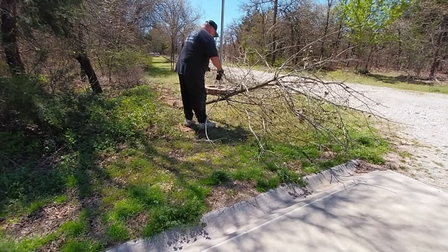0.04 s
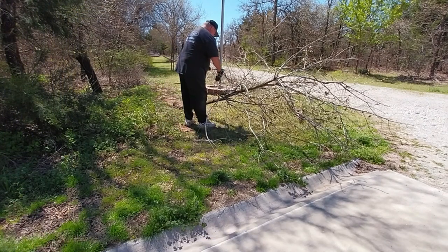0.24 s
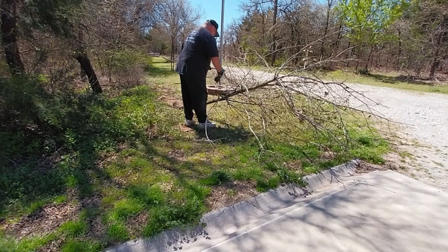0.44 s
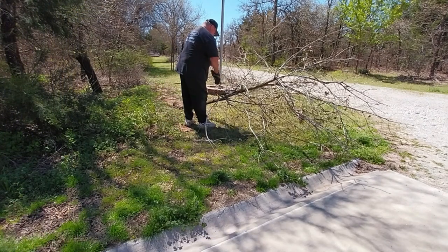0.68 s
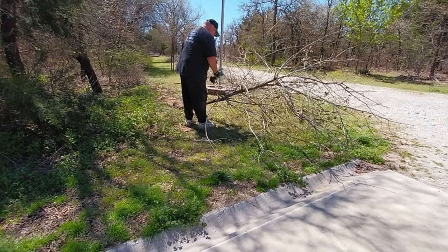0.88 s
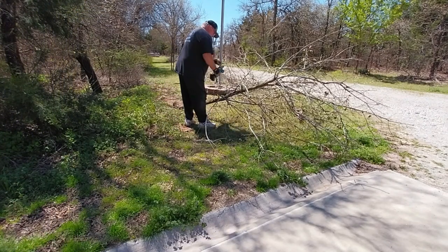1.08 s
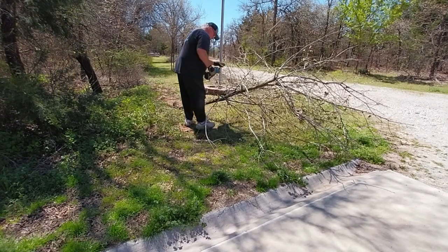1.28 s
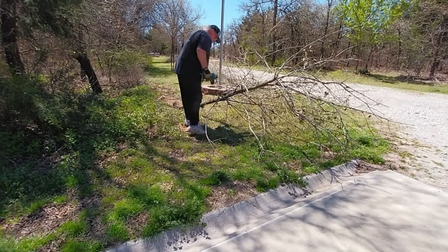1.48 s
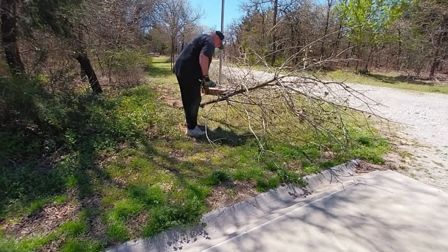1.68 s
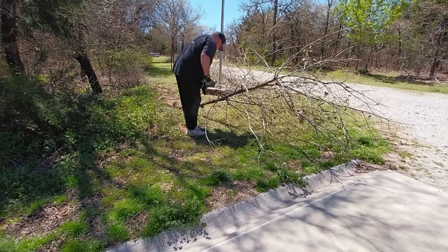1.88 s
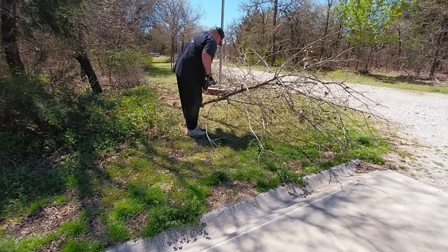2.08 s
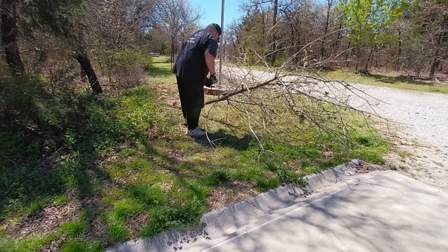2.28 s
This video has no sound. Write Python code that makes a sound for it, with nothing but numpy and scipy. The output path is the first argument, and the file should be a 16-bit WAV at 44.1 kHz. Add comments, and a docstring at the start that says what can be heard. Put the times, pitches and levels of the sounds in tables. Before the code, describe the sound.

A small electric chainsaw bites quickly through wood, whines, and winds down in light wind.

```python
"""A small battery chainsaw bites through a dry branch, races as it breaks free, then coasts to a stop.
Outdoors, a few metres from a stereo microphone pair. Cutters chop the wood, the chain rattles and whines
round its bar, and the ground reflects chop and rattle as the saw is lifted and lowered.
Twigs and dry leaves rustle and tick; a light wind rumbles on the microphones."""
import sys
import numpy as np
from scipy import signal
from scipy.fft import rfft, irfft
from scipy.io import wavfile
from scipy.ndimage import uniform_filter1d

SR = 44100
rng = np.random.default_rng(int(sys.argv[2]) if len(sys.argv) > 2 else 0)


def generate_wav(sig):
    """Save sig (samples, or channels by samples) to the path in sys.argv[1] as 16-bit PCM at SR."""
    pcm = np.round(np.clip(np.atleast_2d(sig).T, -1, 1) * 32767).astype(np.int16)
    wavfile.write(sys.argv[1], SR, pcm)


N = 108045

# chain speed: t/s, cutter rate/Hz
CHAIN_SPEED = [(.19, 104.3), (.25, 151.4), (.41, 162.7), (.49, 161.7), (.53, 192), (.6, 195), (.7, 224),
               (.77, 237), (.82, 240), (.9, 203), (1.0, 178), (1.1, 162), (1.25, 135), (1.41, 101),
               (1.7, 58.7), (2.08, 6.25)]
# spectrum of tearing wood: f/Hz, relative level/dB
WOOD_SPECTRUM = [(150, -26), (300, -11), (450, -5.5), (700, 0.5), (1000, -5), (1800, 1.5), (2800, -6),
                 (4500, -13.5), (7500, -8), (9000, -23), (16000, -16.5)]
TRIGGER_OFF_S = 0.78
CENTRE = np.array([[1], [0]])  # all mid, no side


def cut(turns, breaks_free_s=0.56, release_s=0.077):
    """Each cutter knocks the branch and tears out a chip; the branch drones until the bar breaks free."""
    # force of the bite: t/s, level/dB
    bite = [(.19, -76), (.22, -53), (.228, -45), (.268, -42), (.278, -31.5), (.34, -34.5), (.355, -35.5),
            (.41, -34.5), (.445, -31.5), (.49, -35), (.56, -62), (.58, -37.5), (.66, -43)]
    # drone of the branch: multiple of the cutter rate, relative level/dB
    partials = [(3, -6.5), (4, -15.5), (6, -4.5)]
    t = times()
    knocks = strikes(turns, scatter_db=2, jitter_s=0.00011)
    chips = bursts(knocks, decay_s=0.0017) + 0.42 * unit(knocks) * CENTRE
    drone = sum(undb(db + 2 * walk(25)) * np.sin(2 * np.pi * k * turns) for k, db in partials)
    contact = (t > bite[0][0]) * np.exp(-np.maximum(t - breaks_free_s, 0) / release_s)
    return (unit(colour(chips, WOOD_SPECTRUM)) + drone * CENTRE) * undb(curve(bite) - 1.5) * contact


def catches(decay_s=0.0045):
    """Now and then a cutter catches hard and rips the wood."""
    # hard catches: t/s, peak level/dB
    rips = [(0.2786, -25), (0.292, -29.5), (0.3151, -26), (0.3301, -23), (0.3366, -26), (.374, -28),
            (0.398, -32.5), (0.4372, -30), (0.443, -30), (.48, -26.5), (0.577, -31.5)]
    t = times()
    tearing = sum(undb(db) * (t >= at) * np.exp(-np.maximum(t - at, 0) / decay_s) for at, db in rips)
    return tearing * unit(colour(noise(), WOOD_SPECTRUM))


def chain(rate, turns, links_per_cutter=4, slow_hz=145, fast_hz=198):
    """Links clatter along the bar; as they slow, they slide more smoothly and sound duller."""
    # running chain: t/s, rattle level/dB, hiss level/dB
    levels = [(.19, -55, -78), (.235, -46, -53), (.3, -36, -41.5), (.58, -35.5, -43), (.66, -38, -43.5),
              (.745, -36.5, -35.5), (.85, -37, -43.5), (1.0, -38.5, -46), (1.15, -42, -49.5),
              (1.3, -46, -51), (1.45, -47.5, -51.5), (1.65, -52.5, -55.5), (1.77, -53.5, -65),
              (1.85, -59, -67.5), (2.05, -68.5, -75.5), (2.1, -88.5, -98)]
    # spectra of the fast rattle, slow rattle and treble hiss: f/Hz, relative level/dB
    fast_spectrum = [(200, -19.5), (400, -9.5), (780, 4.5), (1200, -5.5), (2080, 4.5), (2350, 2.5),
                     (2680, 3), (3200, -0.5), (4500, -1.5), (6000, -3), (7400, 0), (8800, -13.5),
                     (16000, -34)]
    slow_spectrum = [(200, -17), (400, -7.5), (620, -0.5), (850, -0.5), (1100, -0.5), (1700, -1.5),
                     (2400, 4.5), (3100, 2.5), (3800, 0), (5800, -5.5), (7600, -4.5), (9000, -15),
                     (16000, -34)]
    hiss_spectrum = [(3000, -61.5), (7000, -13.5), (9500, -3), (12000, 8), (13500, 8.5), (16000, 2)]
    t = times()
    fast = np.where(t < TRIGGER_OFF_S, 1, np.clip((rate - slow_hz) / (fast_hz - slow_hz), 0, 1))
    slow = 1 - fast
    clicks = strikes(links_per_cutter * turns, scatter_db=3, jitter_s=0.00052)
    clatter = bursts(clicks, decay_s=0.0048)
    sliding = undb(-0.5) * slow * noise()
    links = unit(clatter + sliding)
    rattle = fast * unit(colour(links, fast_spectrum)) + slow * unit(colour(links, slow_spectrum))
    hiss = unit(colour(links, hiss_spectrum))
    return (rattle * undb(curve(levels)) + hiss * undb(curve(levels, column=2))) * (t > levels[0][0])


def whine(rate, links_per_cutter=4, motor_multiple=1.7, housing_hz=603.5):
    """Links sing, unsteadily under power; slowing overtones glide through the housing's resonance."""
    # whine: t/s, link tone level/dB, housing hum level/dB
    levels = [(.2, -76, -71), (.3, -44, -64), (.53, -44.5, -64), (.58, -57, -64), (.62, -39, -64),
              (.67, -54, -64), (.77, -60, -64), (.83, -44.5, -66), (.95, -49, -70), (1.1, -52.5, -61),
              (1.26, -64, -55), (1.42, -94, -59.5), (1.57, -73, -52.5), (1.9, -87, -72)]
    # sprocket tone, an octave under the links: t/s, level/dB
    sprocket = [(.6, -67), (.69, -53.5), (.9, -55), (.98, -71)]
    # drive overtones in the housing: multiple of the cutter rate, relative level/dB
    overtones = [(5, 2), (6.5, -0.5), (8, -2), (9.5, -3), (11, -2.5)]
    t = times()
    waver = np.where(t < TRIGGER_OFF_S, 0.02, 0.006)
    turns = np.cumsum(rate * (1 + waver * walk(59.2))) / SR

    def partial(k, flutter_db=2):
        """A fluttering tone at k times the cutter rate."""
        return np.sqrt(2) * undb(flutter_db * walk(28)) * np.sin(2 * np.pi * (k * turns + rng.random()))

    links = partial(links_per_cutter) * undb(curve(levels))
    drive = (partial(links_per_cutter / 2) + undb(-4) * partial(motor_multiple)) * undb(curve(sprocket))
    hum = sum(undb(db) * bell(k * rate, housing_hz, octaves=0.18) * partial(k) for k, db in overtones)
    running = (t > CHAIN_SPEED[0][0]) * (t < CHAIN_SPEED[-1][0])
    return (links + drive + hum * undb(curve(levels, column=2))) * running * CENTRE


def bar_ring(width_hz=260):
    """The coasting chain rubs a narrow metallic ring out of the bar."""
    # ring of the bar: t/s, f/Hz, level/dB
    ring = [(1.04, 3170, -51.5), (1.22, 3143, -48), (1.32, 2919, -48), (1.345, 2930, -64),
            (1.42, 3148, -54), (1.46, 3090, -68), (1.74, 2779, -62), (1.8, 2746, -58), (1.85, 2744, -74),
            (2.02, 2610, -71), (2.1, 2640, -93)]
    phase = 2 * np.pi * np.cumsum(curve(ring)) / SR
    rubbed = np.array([walk(width_hz) * np.sin(phase) + walk(width_hz) * np.cos(phase) for _ in range(2)])
    return unit(rubbed) * undb(curve(ring, column=2)) * (times() > ring[0][0])


def ground(x, cutoff_hz=3680, reflection_db=-8):
    """The ground adds a duller copy a moment later."""
    # lag of the reflection, longer while the saw is held high: t/s, lag/ms
    lag = [(.3, 1.54), (.6, 1.574), (.76, 1.45), (.95, 1.466), (1.1, 1.59), (1.3, 1.72), (1.45, 1.69),
           (1.7, 1.78), (2.0, 1.44)]
    t = times()
    dull = signal.sosfilt(signal.butter(2, cutoff_hz, fs=SR, output="sos"), x)
    filter_lag_s = np.sqrt(2) / (2 * np.pi * cutoff_hz)
    delay_s = curve(lag) / 1000 - filter_lag_s
    return x + undb(reflection_db) * np.array([np.interp(t - delay_s, t, channel) for channel in dull])


def twigs(grains_per_s=900, branch_hz=2190):
    """Twigs and dry leaves crackle in patches that make the branch ring; twigs and chain tick."""
    # rustles: start/s, length/s, level/dB, f/Hz, width/octaves, branch ring level/dB
    rustles = [(1.477, 0.013, -42, 4555, 0.99, -70), (1.507, 0.027, -44, 4860, 0.4, -73),
               (2.211, 0.1, -61.5, 3600, 1, -75), (2.338, 0.063, -64.5, 5100, 1, -75)]
    # ticks: t/s, level/dB, f/Hz, width/octaves, decay/s
    ticks = [(0.193, -40, 700, 0.43, 0.0051), (.206, -41.5, 9000, 1.6, 0.0035),
             (0.225, -39.5, 1200, 1.8, 0.01), (1.496, -37.5, 3850, 0.3, 0.006),
             (1.743, -46, 2800, 0.12, 0.0097), (1.928, -51, 7930, 0.036, 0.0051),
             (2.168, -57.5, 5500, 0.79, 0.0078), (2.222, -61, 2400, 0.5, .007),
             (2.244, -54.5, 2900, 1.3, 0.025), (2.3, -52, 4500, 0.87, 0.0063),
             (2.333, -48, 4750, 0.88, 0.0052), (2.443, -50, 7200, 0.49, 0.0087)]
    t, out = times(), 0
    grains = strikes(t * grains_per_s, scatter_db=2.5, jitter_s=1 / grains_per_s)
    crackle, snap = bursts(grains, decay_s=0.0015), noise()
    branch = band(crackle, branch_hz, octaves=0.06)
    for start, length, db, hz, octaves, branch_db in rustles:
        shape = fade_in(start, attack_s=0.012) * np.exp(-np.maximum(t - start - length, 0) / 0.02)
        out = out + shape * (undb(db) * band(crackle, hz, octaves) + undb(branch_db) * branch)
    for start, db, hz, octaves, decay in ticks:
        shape = fade_in(start, attack_s=0.0031) * np.exp(-np.maximum(t - start, 0) / decay)
        out = out + undb(db) * shape * band(snap, hz, octaves)
    return out


def wind():
    """Gusts rumble and buffet on the microphones."""
    # gusts: t/s, rumble level/dB, buffeting level/dB
    gusts = [(0.0, -74.5, -70), (.17, -65.5, -68), (.21, -60, -56), (.43, -62, -70), (.6, -56, -59),
             (.72, -59.5, -75.5), (1.1, -55, -58), (1.39, -58.5, -71.5), (1.57, -51, -60),
             (1.88, -63.5, -81), (2.45, -64, -66)]
    # spectra of the rumble and the deep buffeting: f/Hz, relative level/dB
    rumble_spectrum = [(40, -28.5), (80, -8), (112, 0), (160, -8.5), (205, -4), (280, -17.5), (450, -20.5),
                       (1000, -33), (16000, -105)]
    buffet_spectrum = [(20, -25.5), (40, -11), (60, 4), (85, -5.5), (160, -28.5), (1000, -69)]
    rumble = unit(colour(noise(), rumble_spectrum)) * undb(curve(gusts))
    buffeting = unit(colour(noise(), buffet_spectrum)) * undb(curve(gusts, column=2))
    return rumble + buffeting


def far_tone():
    """A faint, wavering tone comes in from far off."""
    # distant tone: start/s, f/Hz, level/dB
    tone = (2.073, 606, -75.5)
    start, hz, db = tone
    phase = 2 * np.pi * np.cumsum(hz * (1 + 0.013 * walk(40))) / SR
    return np.sin(phase) * undb(db + 5 * walk(25)) * fade_in(start, attack_s=0.047) * CENTRE


def air():
    """The quiet wash of distant open air."""
    # outdoor ambience: f/Hz, relative level/dB
    spectrum = [(30, -28), (200, 0), (400, -6), (600, 2.5), (900, -10.5), (1500, -19.5), (3000, -17.5),
                (7000, -12), (9000, -24.5), (16000, -13)]
    return unit(colour(noise(), spectrum)) * undb(-71.5 + walk(11))


def undb(db):
    """Decibels to gain."""
    return 10 ** (np.asarray(db) / 20)


def times():
    """Time of every sample in seconds."""
    return np.arange(N) / SR


def fade_in(start_s, attack_s):
    """A straight rise from 0 to 1."""
    return np.clip((times() - start_s) / attack_s, 0, 1)


def curve(table, column=1):
    """One column of a table, joined by straight lines in time."""
    rows = np.array(table, float)
    return np.interp(times(), rows[:, 0], rows[:, column])


def unit(x):
    """Scale to rms 1."""
    return x / np.sqrt(np.mean(x ** 2) + 1e-18)


def noise():
    """Two unrelated noises: mid and side."""
    return rng.standard_normal((2, N))


def walk(rate_hz):
    """A smooth random wander with spread 1."""
    span = max(int(SR / rate_hz), 1)
    return unit(uniform_filter1d(uniform_filter1d(rng.standard_normal(N), span), span))


def colour(x, points, size=2048):
    """Causal filter that follows points of f/Hz, gain/dB."""
    hz, db = np.array(points, float).T
    grid = np.maximum(np.fft.rfftfreq(size, 1 / SR), 1)
    cepstrum = irfft(np.log(undb(np.interp(np.log(grid), np.log(hz), db))))
    cepstrum[1:size // 2] *= 2  # fold to minimum phase
    cepstrum[size // 2 + 1:] = 0
    impulse = irfft(np.exp(rfft(cepstrum)))
    return signal.fftconvolve(np.atleast_2d(x), impulse[None], axes=1)[:, :N]


def bell(hz, centre_hz, octaves):
    """Gain of a broad resonance."""
    return 1 / (1 + (np.log2(np.maximum(hz, 1) / centre_hz) / octaves) ** 2)


def band(x, centre_hz, octaves):
    """Sound through a broad resonance, at rms 1."""
    return unit(irfft(rfft(x) * bell(np.fft.rfftfreq(N, 1 / SR), centre_hz, octaves), N))


def strikes(turns, scatter_db, jitter_s):
    """One uneven click for each whole turn of a phase."""
    at = np.flatnonzero(np.diff(np.floor(turns)) > 0)
    late, strength = rng.standard_normal((N // 10, 2))[:len(at)].T
    at = np.clip(at + late * jitter_s * SR, 0, N - 1).astype(int)
    return np.bincount(at, undb(scatter_db * np.clip(strength, -2, 2)), N)


def bursts(clicks, decay_s):
    """Every click sets off a short burst of noise."""
    power = signal.lfilter([1], [1, -np.exp(-2 / (decay_s * SR))], clicks ** 2)
    return unit(np.sqrt(power) * noise())


def wide(x, side_db):
    """Apply a gain to the side of a mid and side pair."""
    return x * undb([[0], [side_db]])


def scene():
    """Saw, twigs and wind as the left and right microphones hear them."""
    # stereo width of the pair: f/Hz, side gain/dB
    width = [(40, -3), (120, -16), (220, -7.5), (330, -9), (700, -12.5), (1300, -16.5), (2300, -16.5),
             (4500, -6), (8000, -4), (16000, -1)]
    # balance of the pair: f/Hz, left over right/dB
    balance = [(60, 2.5), (700, 0.5), (2400, -0.5), (5000, 0.5), (6500, -1), (8000, 4), (10500, 7.5),
               (12500, 7.5), (14000, -1), (16000, 0.5)]
    rate = curve(CHAIN_SPEED)
    turns = np.cumsum(rate) / SR  # one turn per cutter
    wood = wide(cut(turns) + catches(), side_db=-2)
    saw = ground(wood + chain(rate, turns)) + whine(rate) + wide(bar_ring(), side_db=1)
    mid, side = saw + wide(twigs(), side_db=3.5) + far_tone() + wind() + wide(air(), side_db=9.5)
    side = colour(side, width)[0]
    left = colour(mid + side, [(hz, db / 2) for hz, db in balance])
    right = colour(mid - side, [(hz, -db / 2) for hz, db in balance])
    return np.vstack([left, right])


def record(dry):
    """The recorder cuts the top steeply at 15.9 kHz."""
    return signal.sosfilt(signal.ellip(12, .1, 80, 15900, fs=SR, output="sos"), dry)


dry = scene()
out = record(dry)
generate_wav(out)
```